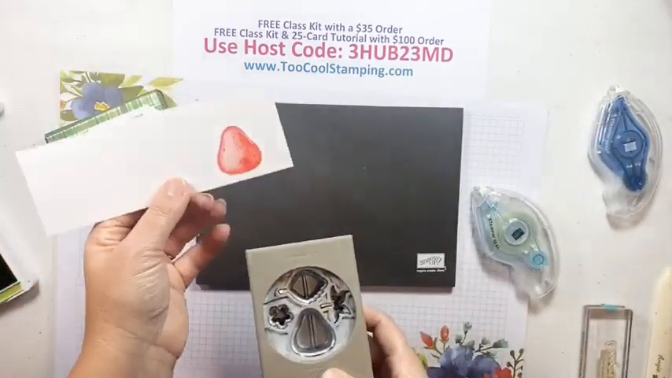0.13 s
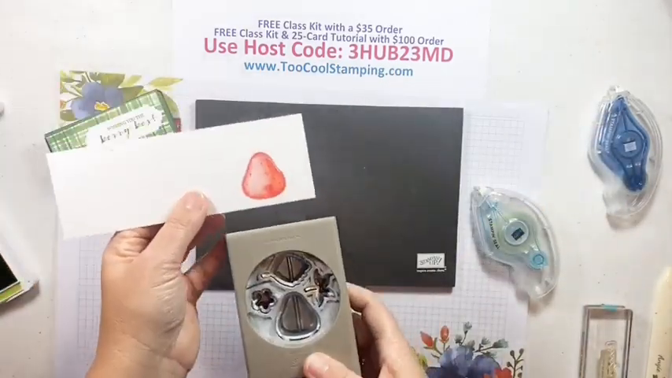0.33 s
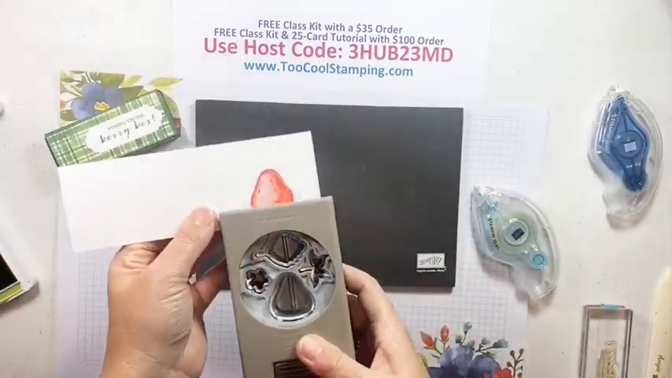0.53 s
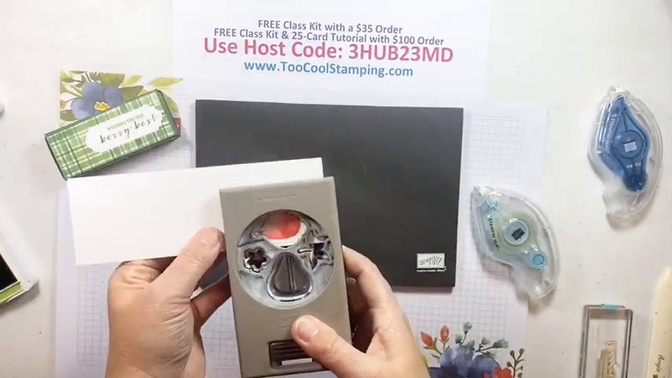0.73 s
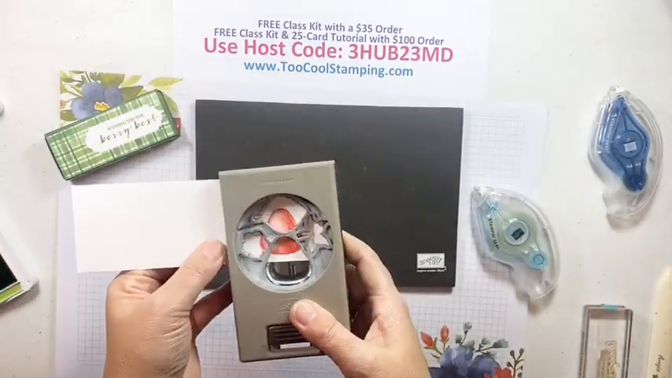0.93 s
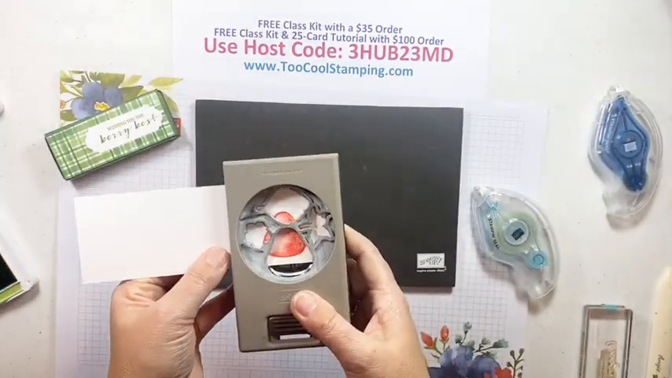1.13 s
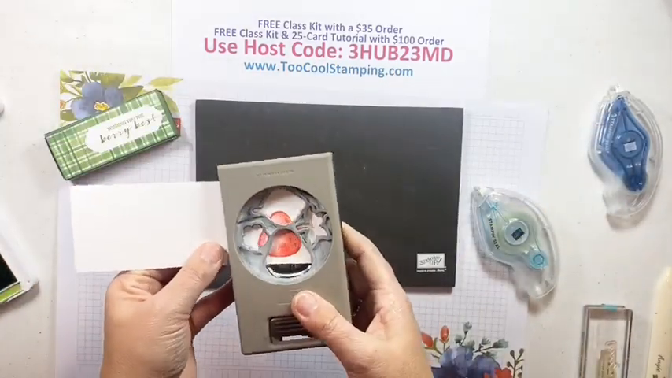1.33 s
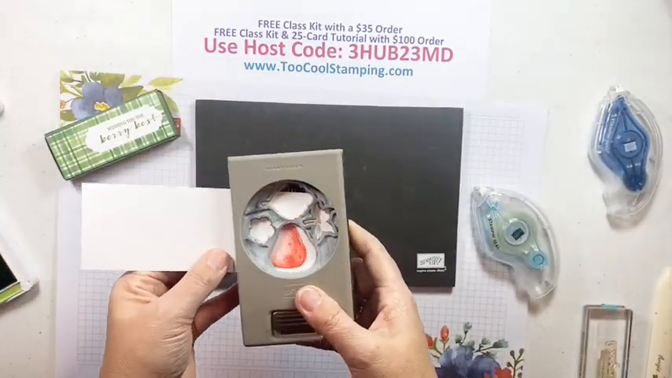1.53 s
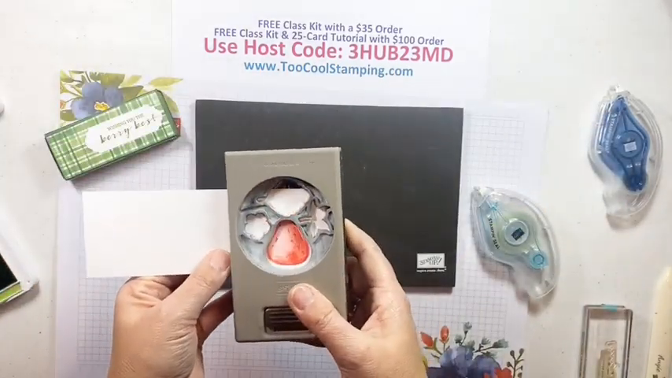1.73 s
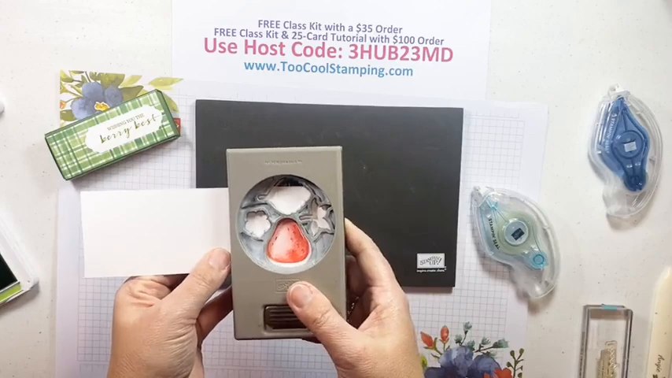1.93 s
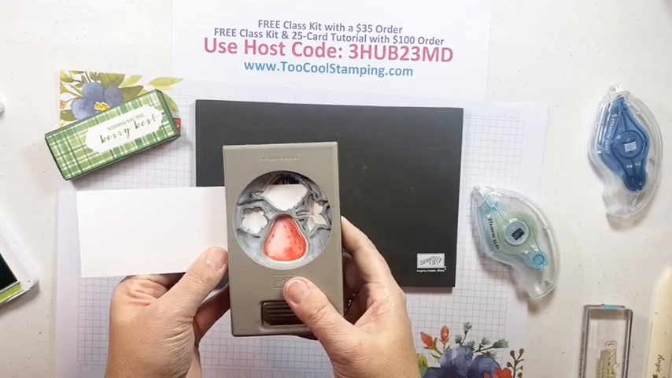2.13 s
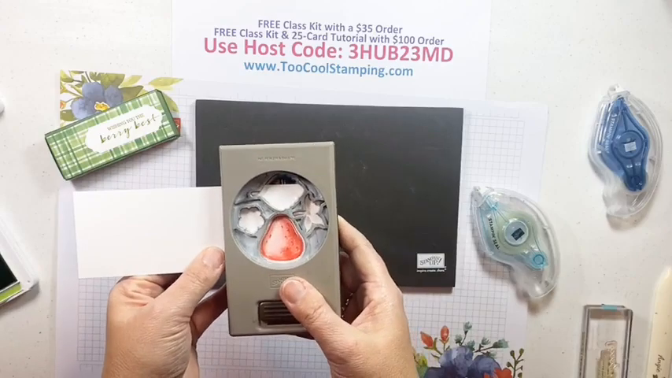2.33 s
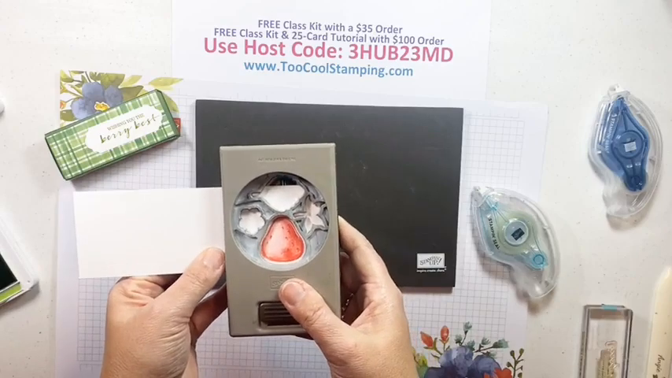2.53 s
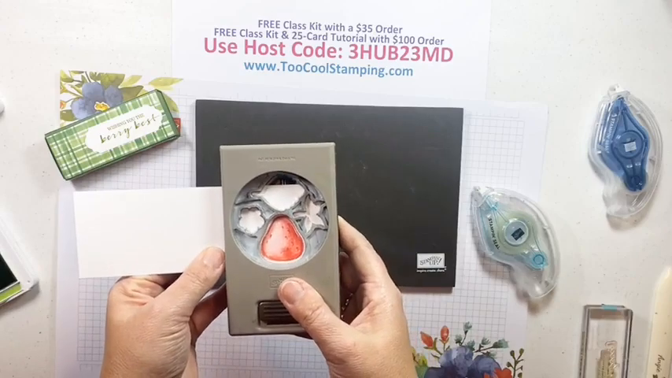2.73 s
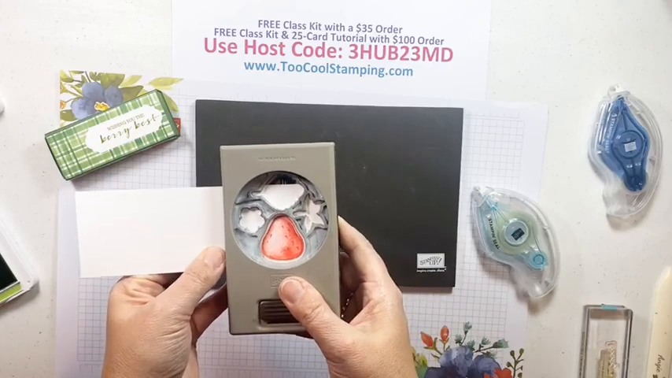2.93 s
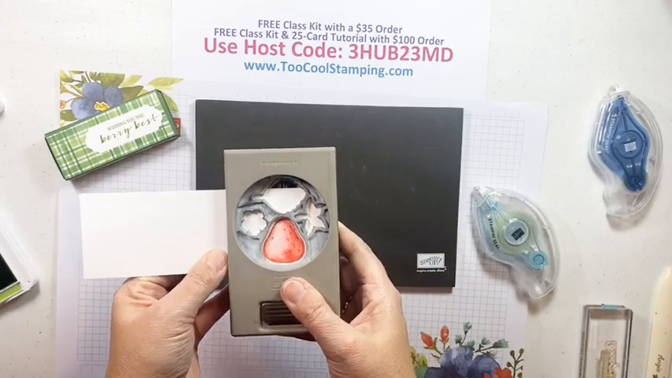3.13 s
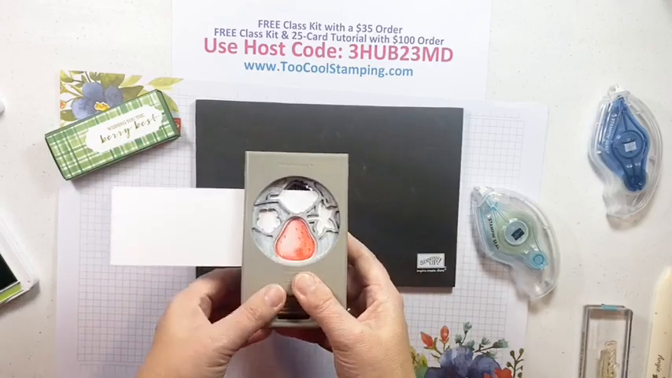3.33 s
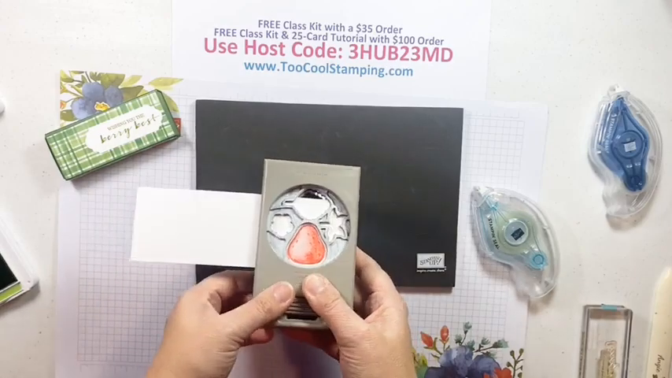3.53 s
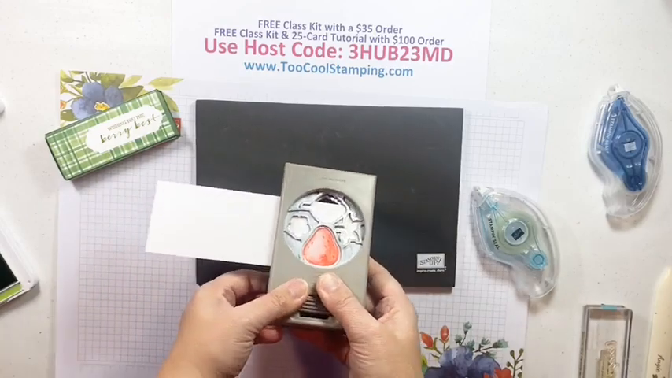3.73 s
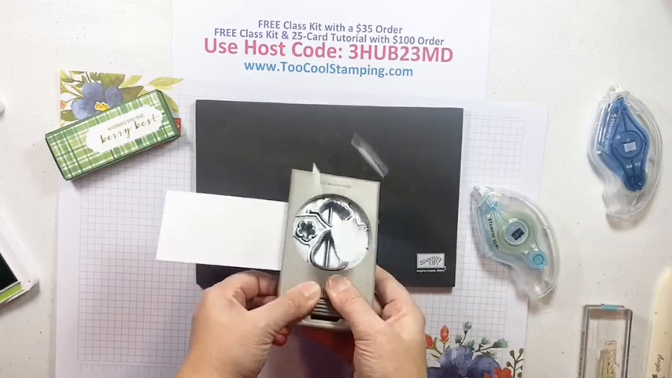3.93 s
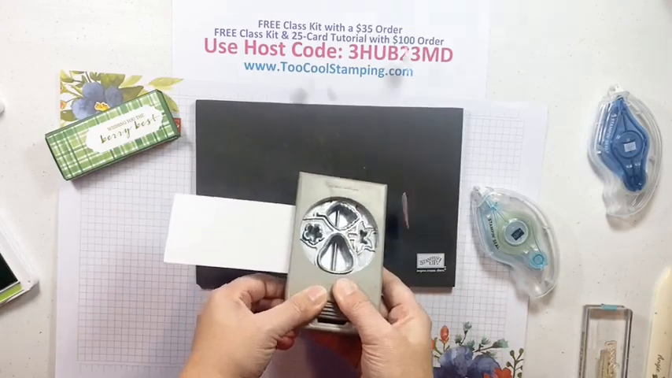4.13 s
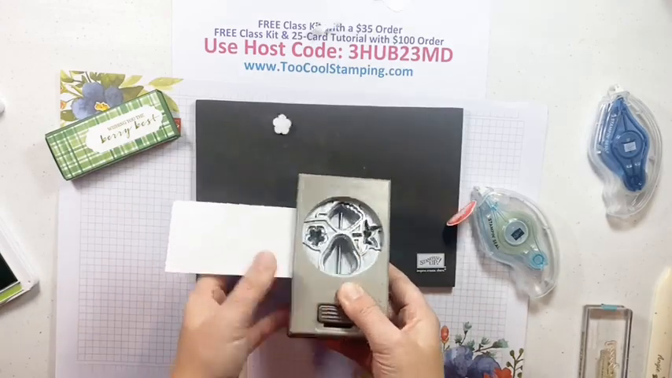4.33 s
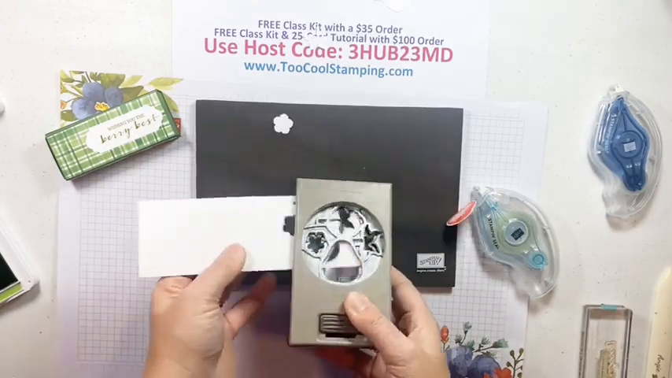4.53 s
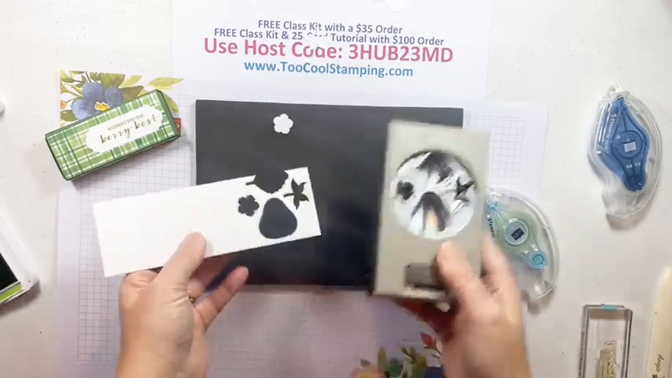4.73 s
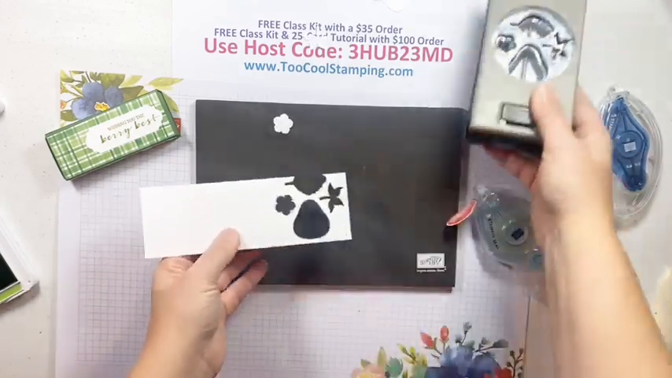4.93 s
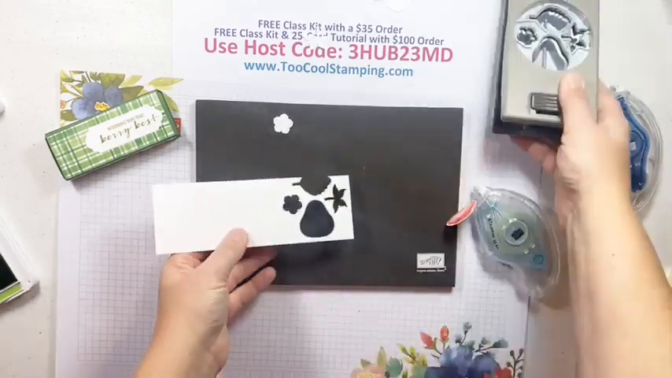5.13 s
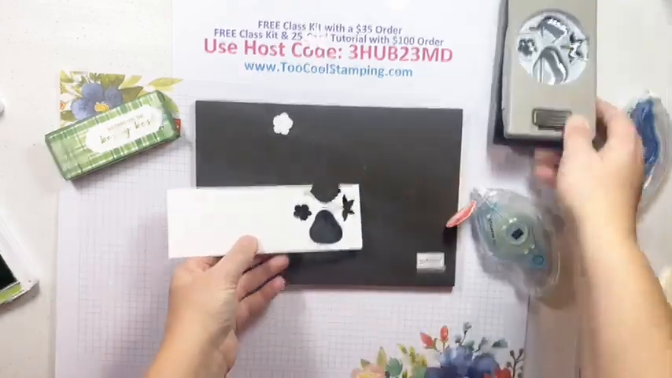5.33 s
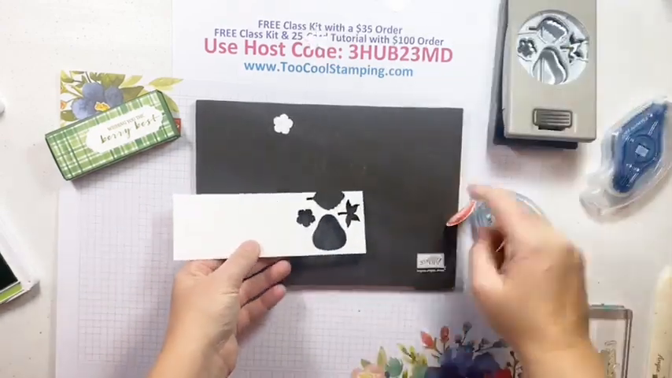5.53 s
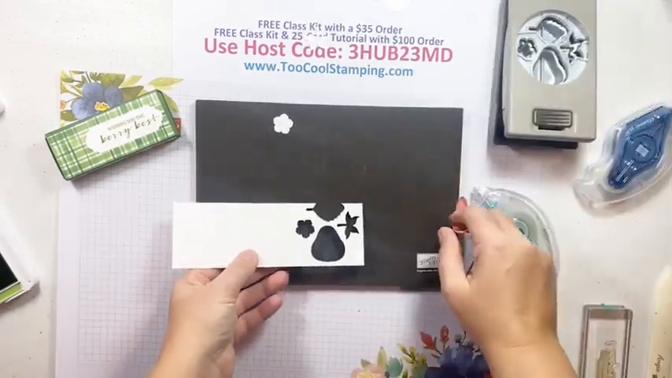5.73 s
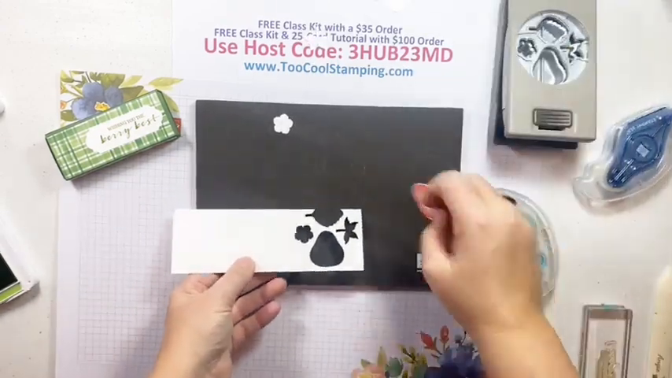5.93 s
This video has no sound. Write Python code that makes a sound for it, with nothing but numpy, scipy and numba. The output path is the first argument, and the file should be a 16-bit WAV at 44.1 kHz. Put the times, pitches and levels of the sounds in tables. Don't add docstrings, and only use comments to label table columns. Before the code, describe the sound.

A small, quiet room with soft steady air and slight hiss, heard by a close mono microphone with short reflections. From 0 to 1.3 seconds card rubs faintly into a punch slot, with dry papery strokes clearest around 0.85 and 1.15. Light clicks come at 1.45 and 1.62, the second firmer, with more soft rubbing. From 1.9 to 3.3 it is almost silent, apart from a tiny tick near 2.3. At 3.5 to 3.7 a cluster of hollow metallic clicks begins the squeeze; a stronger clack at 3.93 leads to the loudest crunching snaps at 4.03 to 4.1, bright and ringing. Lever clicks and raspy card pulls follow from 4.3 to 4.8. The punch touches down with a low thud at 5.21, a faint scuff, then a heavier rocking thump at 5.45 to 5.51 with table resonance. A faint gritty fingertip drag rises at 6.02 until the end.

```python
import sys
import numpy as np
from scipy import signal
from scipy.fft import rfft, irfft
from scipy.io import wavfile
from scipy.ndimage import uniform_filter1d
from numba import njit

SR = 44100
rng = np.random.default_rng(int(sys.argv[2]) if len(sys.argv) > 2 else 0)


def master_out(mix):
    frames = np.transpose(np.atleast_2d(mix))
    ceiling = np.clip(frames, -1, 1)
    pcm = np.round(ceiling * 32767).astype(np.int16)
    wavfile.write(sys.argv[1], SR, pcm)


def convert_level_to_amplitude(level_db):
    exponent = np.asarray(level_db, float) / 20
    return 10 ** exponent


N = 267907


def rms_one(x):
    return x / np.sqrt(np.mean(x ** 2) + 1e-20)


def peak_one(x):
    return x / np.max(np.abs(x))


def with_energy_of(x, model):
    return x * np.sqrt(np.sum(model ** 2) / np.sum(x ** 2))


def at_hz(points, hz):
    points_hz, values = np.transpose(points)
    return np.interp(np.log(hz), np.log(points_hz), values)


def band(x, low_hz, high_hz):
    sos = signal.butter(2, [low_hz, min(high_hz, 0.45 * SR)], "band", fs=SR, output="sos")
    return signal.sosfilt(sos, x)


def resonance(x, hz, width_hz):
    r = np.exp(-np.pi * width_hz / SR)
    feedback = [1, -2 * r * np.cos(2 * np.pi * hz / SR), r * r]
    return signal.lfilter([(1 - r * r) / 2, 0, (r * r - 1) / 2], feedback, x)


def body(x, modes):
    return sum((-1) ** k * convert_level_to_amplitude(db) * resonance(x, hz, width) for k, (hz, width, db) in enumerate(modes))


@njit
def gliding(x, hz, width_hz, sr):
    y, r = np.zeros(len(x)), np.exp(-np.pi * width_hz / sr)
    for i in range(2, len(x)):
        turn = 2 * r * np.cos(2 * np.pi * hz[i] / sr)
        y[i] = x[i] - x[i - 2] + turn * y[i - 1] - r * r * y[i - 2]
    return y


def add(out, s, piece):
    i = round(s * SR)
    out[i:i + len(piece)] += piece[:N - i]


def tear(noise, rise_s, fall_s):
    t = np.arange(len(noise)) / SR
    slips = noise * np.abs(noise) ** 0.61
    return slips * (1 - np.exp(-t / rise_s)) ** 2 * np.exp(-t / fall_s) + 1e-18


# f/Hz, level/dB [per Hz]
HUSH = [(15, -41.5), (25, -18.5), (53, -2.5), (260, -7), (800, -14), (1600, -22), (6560, -26), (16000, -42)]
HUSH_DB = -67


def hush():
    hz = np.maximum(np.fft.rfftfreq(N, 1 / SR), 1)
    spectrum = rfft(rng.standard_normal(N)) * convert_level_to_amplitude(at_hz(HUSH, hz))
    return convert_level_to_amplitude(HUSH_DB) * rms_one(irfft(spectrum, N))


# f/Hz, width/Hz, level/dB
SHEEN = [(7430, 1900, 23.5), (8950, 2200, 19.5), (10460, 4500, -5), (12990, 4400, -13), (15450, 2500, -8.5)]
CUT_S, FREE_S = 4.07, 5.0
SWELL_DB, EASE_DB = 17.5, 18
RASP_OVER_SLOT = 2.387
FRAYED_FLAP = 0.2
FRAYED_SPREAD = 0.83
SMOOTH_HISS_DB, FRAYED_HISS_DB = -23.5, -8.5
HISS_FOLLOWS = 0.7
CATCH_DB, CATCH_S = 2.5, 0.012
# t/s [firmest contact], length/s, level/dB, slot f/Hz, edge rasp level/dB [beside slot]
FEEDING = [(0.023, 0.06, -67.5, 1510, -7), (0.32, 0.083, -67, 1770, -7), (0.841, 0.067, -54, 1935, 5.5),
           (0.888, 0.036, -50, 1960, -1), (0.98, 0.11, -57, 1860, -1), (1.063, .07, -57.5, 1490, -5),
           (1.147, 0.066, -49, 1560, -8.5), (1.222, 0.069, -57.5, 1450, -8.5),
           (1.466, 0.064, -61, 1410, -6.5), (1.59, 0.084, -54, 1440, -9.5), (1.717, 0.09, -69.5, 1340, 1.5),
           (1.815, .12, -63.5, 1540, -10), (2.336, 0.061, -68, 1600, -10), (2.504, 0.09, -70.5, 1100, -6),
           (3.34, 0.085, -67.5, 1570, -4), (3.511, 0.058, -62.5, 1310, -18), (3.64, 0.046, -45, 1370, -3),
           (3.825, 0.039, -53, 1370, -6.5)]
# t/s, length/s, level/dB, slot f/Hz, rasp level/dB
DRAWING = [
    (4.32, 0.043, -47, 1790, 4.5),
    (4.36, 0.05, -51, 1510, -5),
    (4.44, 0.09, -56.5, 1520, 3),
    (4.52, 0.092, -60.5, 1626, 7),
    (4.58, 0.05, -59, 1440, -9),
    (4.625, 0.025, -61, 880, -20),
    (4.70, .11, -64, 1730, 11.5),
    (4.80, 0.1, -66.5, 1510, 0.5),
]
# t/s, length/s,
# level/dB, slot f/Hz, rasp level/dB
SCUFFING = [
    (5.40, 0.15, -55.5, 1012, -6.5),
    (5.639, 0.45, -67.5, 1300, -25),
]


def rubbing():
    t = np.arange(N) / SR
    uneven = convert_level_to_amplitude(2.2 * np.minimum(rng.exponential(1, N), 3))
    grains = rng.standard_normal(N) * uneven * (rng.random(N) < 0.3)
    s, length, level_db, slot_hz, rasp_db = np.transpose(FEEDING + DRAWING + SCUFFING)
    hz = np.interp(t, s, slot_hz)
    whole = t < CUT_S

    loose = rms_one(band(grains[::-1], 500, 2820))
    slot = rms_one(gliding(grains, hz, 370.0, SR)) + np.where(whole, 0.18, FRAYED_SPREAD) * loose

    flaps = np.zeros(N)
    for ratio, share in (0.93, 0.88), (0.81, 0.8), (0.6, 0.327):
        flaps += share * rms_one(gliding(grains, ratio * RASP_OVER_SLOT * hz, 240.0, SR))
    scratch = rms_one(band(np.roll(grains, SR), 2200, 7700))
    rasp = np.where(whole, 0.8, FRAYED_FLAP) * flaps + 0.93 * scratch

    hiss = rms_one(body(band(grains, 9000, 21000), SHEEN))
    hiss = hiss + 0.83 * rms_one(band(grains[::-1], 8500, 16000))
    frayed = (s > CUT_S) & (s < FREE_S)
    hiss_db = np.where(frayed, FRAYED_HISS_DB, SMOOTH_HISS_DB) + HISS_FOLLOWS * rasp_db

    catch_size = round(CATCH_S * SR)
    slow = uniform_filter1d(uniform_filter1d(grains, catch_size), catch_size)
    out = np.zeros(N)
    for k in range(len(s)):
        on = np.abs(t - s[k]) < 3 * length[k]
        late = (t[on] - s[k]) / length[k]
        below_db = np.where(late < 0, SWELL_DB, EASE_DB) * np.abs(late) ** 1.16
        press = convert_level_to_amplitude(level_db[k] - 11.0 - below_db)
        out[on] += press * (slot[on] + convert_level_to_amplitude(rasp_db[k]) * rasp[on] + convert_level_to_amplitude(hiss_db[k]) * hiss[on])
    return convert_level_to_amplitude(CATCH_DB * rms_one(slow)) * out


GRIP_DETUNE, GRIP_DB = 0.025, 2
CUSHIONED_DB, BARE_DB = -11, -1
AIR_DB = 10.5
HINGE_BELOW_HZ, HINGE_DULL_DB = 1120, -5
HINGE_HZ, HINGE_SHARE = 775, 0.57
# f/Hz, width/Hz, level/dB
PLATE = [(2470, 270, -2), (2900, 460, 2), (3355, 230, 2), (4560, 400, -3), (5000, 156, -15)]
# t/s, shell ring level/dB,
# shell f/Hz, plate ring level/dB, low knock level/dB
SNAPS = [(1.45, -54, 1500, -61, -63), (1.6179, -41, 1560, -43.5, -56.5), (2.3228, -62, 1830, -62, -70),
         (3.3257, -62, 580, -68, -63), (3.5179, -55, 1420, -72, -65), (3.598, -30, 1410, -36.5, -38.5),
         (3.6069, -32, 1330, -45, -69), (3.6365, -31.5, 1320, -36.5, -57),
         (3.6777, -32.5, 1350, -29.5, -53.5), (3.687, -43, 850, -38.5, -55),
         (3.832, -50.5, 1330, -62, -70.5), (3.9342, -20.5, 1316, -24.5, -41),
         (4.0421, -19.5, 1840, -10.5, -35), (4.0578, -27.5, 1800, -21, -50), (4.092, -18, 1850, -20.5, -41),
         (4.0981, -16, 1030, -24, -34.5), (4.3045, -36, 2160, -42, -54.5), (4.351, -45, 1040, -41, -47.5),
         (4.4371, -50, 1310, -39.5, -52.5), (4.5566, -47.5, 2040, -54, -60.5), (4.6, -74, 1000, -58, -54.5),
         (4.626, -70, 1060, -76, -60)]


def snaps():
    near, spread = np.zeros(N), np.zeros(N)
    click = np.full(4096, 1e-18)
    click[60] += 1
    for (s, shell_db, shell_hz, plate_db, knock_db), noise in zip(SNAPS, rng.standard_normal((len(SNAPS), 4096))):
        start = s - 0.002
        hinge = shell_hz < HINGE_BELOW_HZ
        crack_db = plate_db + (CUSHIONED_DB if s < CUT_S else BARE_DB) + HINGE_DULL_DB * hinge
        force = tear(noise, rise_s=0.001, fall_s=0.0026)

        held = [(hz * (1 + GRIP_DETUNE * z), width, db + GRIP_DB * y)
                for (hz, width, db), z, y in zip(PLATE, noise[-5:], noise[-10:])]
        ring = peak_one(body(body(click, held), held))
        clatter = peak_one(band(band(force, 2000, 5800), 1800, 6200))
        plate = convert_level_to_amplitude(plate_db + 1.0) * peak_one(ring + 0.74 * clatter)
        smooth = band(band(click, 2300, 4100) + 0.32 * resonance(click, 2900, 400), 1900, 5000)
        add(near, start, plate)
        add(spread, start, with_energy_of(smooth, plate))

        hollow = peak_one(resonance(resonance(click, shell_hz, 380), shell_hz, 380))
        arm = peak_one(resonance(resonance(click, HINGE_HZ, 200), HINGE_HZ, 200))
        hollow = hollow + HINGE_SHARE * hinge * arm

        def shell(f):
            return hollow + 0.81 * peak_one(band(f, 1100, 2580))

        def crack(f):
            return body(band(f, 3700, 14000), SHEEN) + convert_level_to_amplitude(AIR_DB) * band(f, 10000, 15000)

        def knock(f):
            return band(band(f, 140, 900) + 0.27 * resonance(f, 800, 340), 120, 1600)

        for part, db in (shell, shell_db - 2), (crack, crack_db + 5), (knock, knock_db + 4):
            sound = convert_level_to_amplitude(db) * peak_one(part(force))
            add(near, start, sound)
            add(spread, start, with_energy_of(part(click), sound))
    return near, spread


# t/s, swell/s, dying/s, level/dB, brightness
# level/dB
SHEARS = [
    (3.124, .008, 0.0071, -86, 32),
    (3.924, 0.005, 0.004, -56, -1),
    (4.030, 0.011, 0.015, -29, 6),
    (4.085, 0.0016, 0.032, -29, -2),
    (4.65, 0.044, 0.042, -70, 24),
    (4.78, 0.019, 0.018, -62.5, 12),
    (5.443, 0.0077, 0.033, -40.5, -4),
    (5.210, 0.0027, .015, -45.5, -8),
]


def shears():
    out, t = np.zeros(N), np.arange(8192) / SR
    for (s, swell, dying, level_db, bright_db), noise in zip(SHEARS, rng.standard_normal((len(SHEARS), 8192))):
        shape = np.where(t < swell, (t / swell) ** 3, np.exp((swell - t) / dying))
        bright = convert_level_to_amplitude(bright_db - 17.0) * rms_one(band(noise, 11000, 17000))
        crunch = rms_one(band(noise, 700, 4800)) + bright
        add(out, s, convert_level_to_amplitude(level_db) * shape * crunch)
    return out


EDGE_CRACK_DB, FLAT_CRACK_DB = -37, -15
EDGE_RATTLE, FLAT_RATTLE = 0.16, 1
FLAT_FROM_S = 5.3
SETTLE_S = 0.015
# f/Hz, level/dB, t60/s
TABLE = [(64, -16, 0.52), (93.4, 0.5, 0.17), (116.2, -1, 0.44), (183.5, 1.5, 0.26), (242, 4.5, 0.15),
         (287.4, -4, 0.322), (374.2, -7.5, 0.26), (564.2, -13.5, 0.38), (694, -1, 0.047), (828, -20, 0.35),
         (1077, -49, 0.24)]
# t/s, table level/dB, shell knock level/dB, deep sag level/dB
THUDS = [
    (5.212, -21, -39, 2),
    (5.22, -47, -29.5, -12),
    (5.234, -31.5, -34.5, 7.5),
    (5.445, -22, -32.5, 6.5),
    (5.454, -11.5, -34, 5),
    (5.464, -14, -39, -18),
    (5.472, -26, -27, 8),
    (5.484, -16.5, -39, 5.5),
    (5.499, -17.5, -36.5, 6),
    (5.514, -27.5, -33, -2),
]


def thuds():
    table, shell, t = np.zeros(N), np.zeros(N), np.arange(SR // 2) / SR
    gaps = np.diff([row[0] for row in THUDS] + [N / SR])
    noises = rng.standard_normal((len(THUDS), SR // 2))
    for (s, table_db, knock_db, sag_db), gap, noise in zip(THUDS, gaps, noises):
        edge = s < FLAT_FROM_S
        free = np.clip(min(gap / SETTLE_S, 1), 0.15, 1.5)
        rings = np.zeros(len(t))
        for (hz, db, t60), z, y in zip(TABLE, noise, noise[20:]):
            tone = np.sin(2 * np.pi * hz * (1 + 0.0088 * y) * t)
            rings += convert_level_to_amplitude(db + 2.0 * z + sag_db * (hz < 140)) * tone * convert_level_to_amplitude(-60 * t / (t60 * free))
        rumble = rms_one(band(noise, 59, 310)) * convert_level_to_amplitude(-60 * t / 0.34)
        rumble += rms_one(band(noise, 52, 205)) * convert_level_to_amplitude(-24.5 - 60 * t / 1.39)
        soft = 1 - np.exp(-t / 0.002)
        add(table, s, convert_level_to_amplitude(table_db - 12.5) * (rings + 0.51 * rumble) * soft)

        force = tear(noise[:4096], rise_s=0.0015, fall_s=0.0041)
        rattle = (EDGE_RATTLE if edge else FLAT_RATTLE) * resonance(force, 2160, 400)
        knock = band(band(force, 390, 2450) + 0.77 * resonance(force, 970, 370) + rattle, 250, 4000)
        crack = band(band(force, 2600, 9000), 2300, 11700)
        crack_db = knock_db + (EDGE_CRACK_DB if edge else FLAT_CRACK_DB)
        add(shell, s - 0.002, convert_level_to_amplitude(knock_db) * peak_one(knock) + convert_level_to_amplitude(crack_db) * peak_one(crack))
    return table, shell


# f/Hz, width/Hz, level/dB
MAT = [(1800, 500, -18), (2960, 170, -7), (4250, 330, -2.5), (5210, 350, 1), (7010, 600, -9),
       (8500, 1900, -15.5)]
# t/s, level/dB
DRAG = [
    (5.88, -84),
    (5.905, -68),
    (5.95, -80),
    (6.0, -82),
    (6.018, -56),
    (6.045, -51),
    (6.052, -51),
    (6.074, -46),
]


def dragging():
    s, level_db = np.transpose(DRAG)
    t = np.arange(N) / SR
    uneven = convert_level_to_amplitude(2.5 * np.minimum(rng.exponential(1, N), 3))
    grains = rng.standard_normal(N) * uneven * (rng.random(N) < 0.2)
    press = (t > s[0]) * convert_level_to_amplitude(np.interp(t, s, level_db))
    return press * rms_one(band(body(grains, MAT), 1300, 12100))


# f/Hz, t60/s
ROOM_T60 = [(100, 0.38), (1000, 0.25), (3000, 0.25), (8000, 0.19), (15000, 0.068)]
# delay t/s, level/dB
ECHOES = [(.0078, -0.5), (.017, -13), (0.034, -19)]
ROOM_DB = -0.5


def room(near, spread):
    t = np.arange(SR // 2) / SR
    edges, white = 80 * 2 ** np.arange(0, 8, 0.5), rng.standard_normal((2, len(t)))
    tail = np.zeros(len(t))
    for k, (low, high) in enumerate(zip(edges, edges[1:])):
        tail += band(white[k % 2], low, high) * convert_level_to_amplitude(-60 * t / at_hz(ROOM_T60, low))
    tail *= convert_level_to_amplitude(ROOM_DB) * np.clip((t - 0.003) / 0.0027, 0, 1) / np.sqrt(np.sum(tail ** 2))
    echoes = np.zeros(len(t))
    for delay, db in ECHOES:
        echoes[round(delay * SR)] = convert_level_to_amplitude(db)
    dulled = signal.lfilter([0.27], [1, -0.68], echoes) + 1.08 * resonance(echoes, 1100, 630)
    return near + signal.fftconvolve(near, dulled)[:N] + signal.fftconvolve(spread, tail)[:N]


def scene():
    background = hush()
    rest = rubbing()
    near, spread = snaps()
    rest = rest + shears()
    table, shell = thuds()
    rest = rest + shell
    mix = room(near + rest, spread + rest) + table + background + dragging()
    return mix[None]


def band_limit(x):
    return signal.sosfilt(signal.butter(12, 16810, fs=SR, output="sos"), x)


def record(dry):
    thin = signal.sosfilt(signal.butter(4, 44, "high", fs=SR, output="sos"), dry)
    finished = signal.sosfilt(signal.cheby2(10, 50, 17000, fs=SR, output="sos"), thin)
    return band_limit(finished)


dry = scene()
out = record(dry)
master_out(out)
```